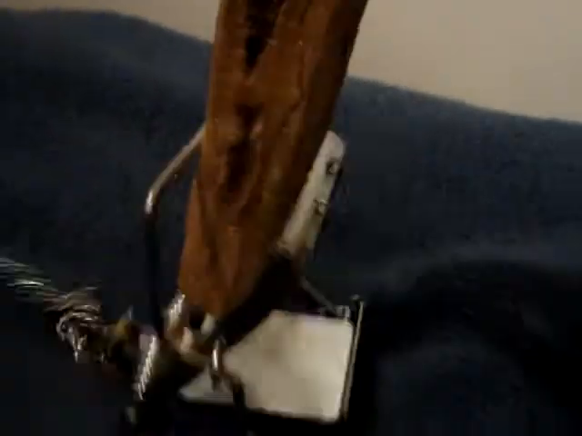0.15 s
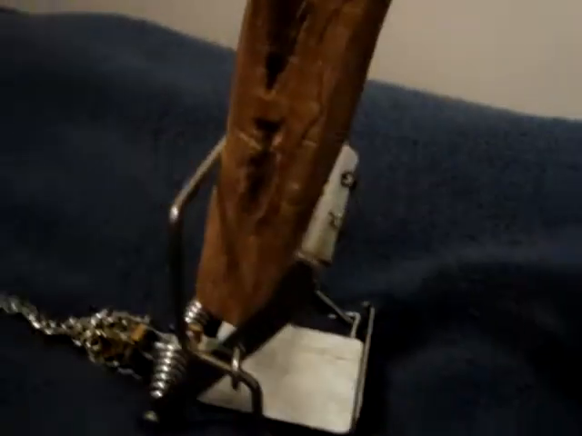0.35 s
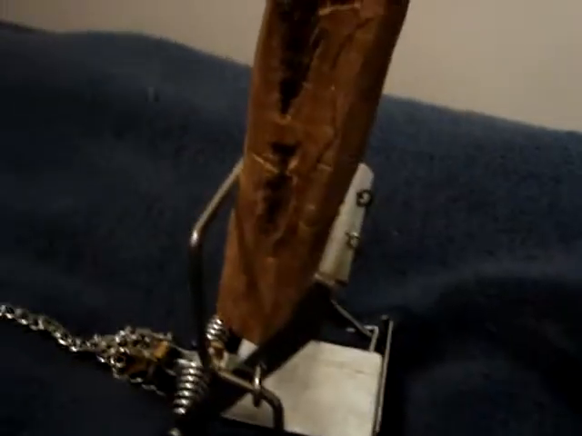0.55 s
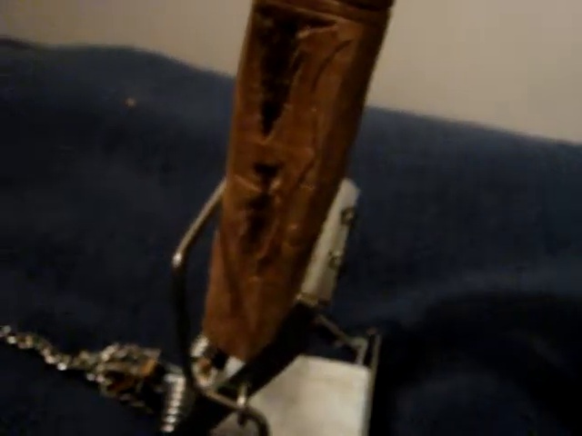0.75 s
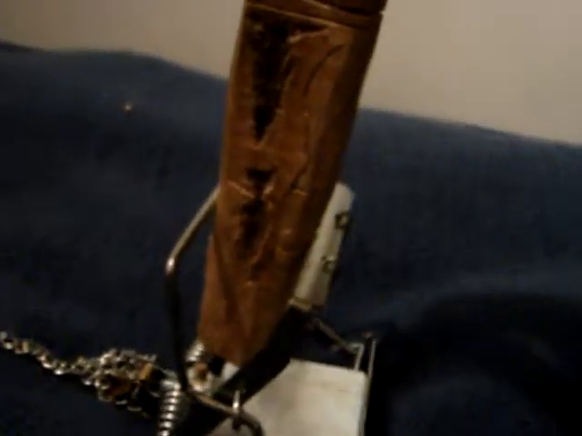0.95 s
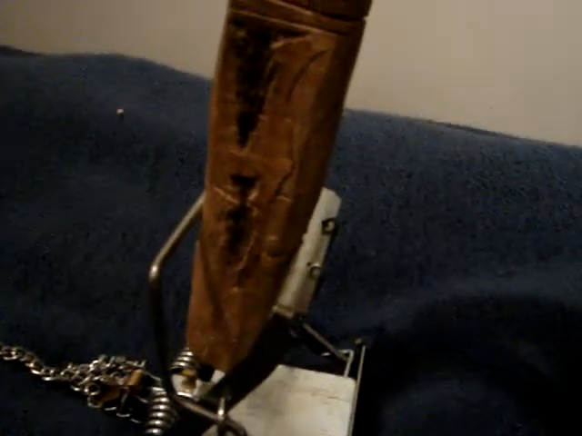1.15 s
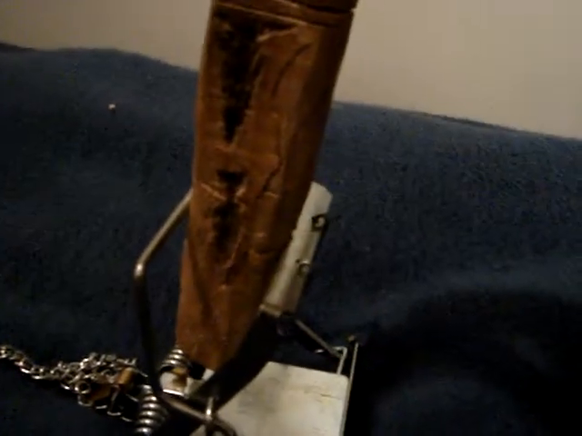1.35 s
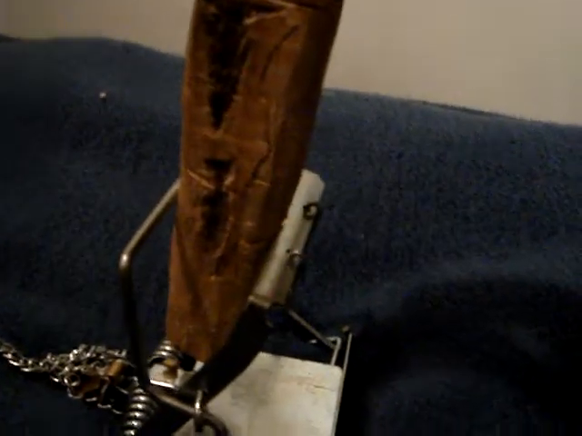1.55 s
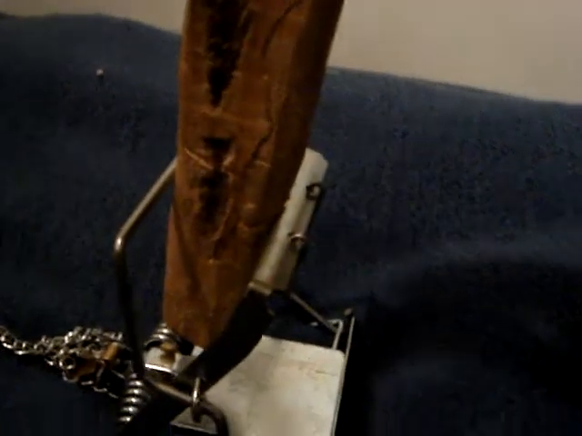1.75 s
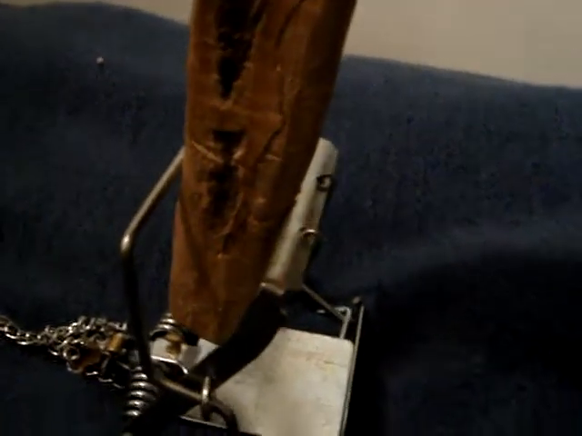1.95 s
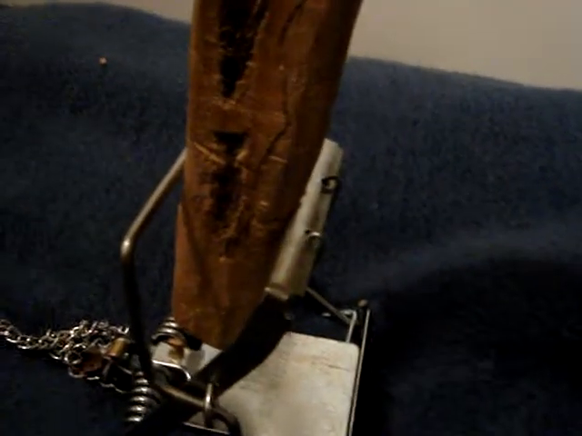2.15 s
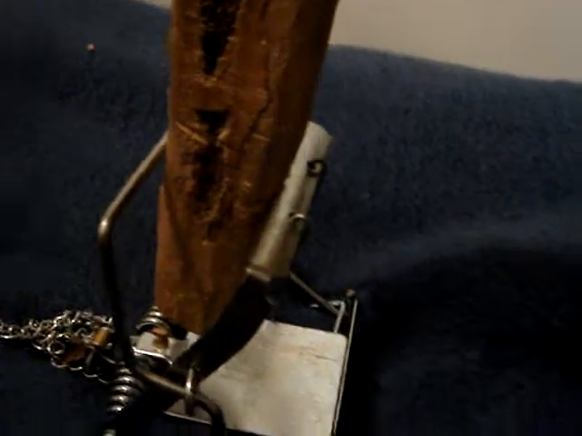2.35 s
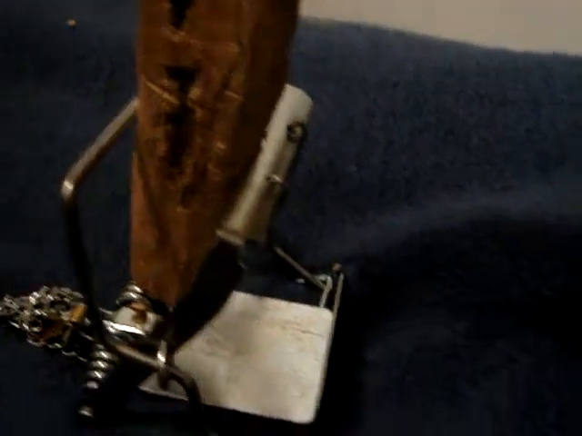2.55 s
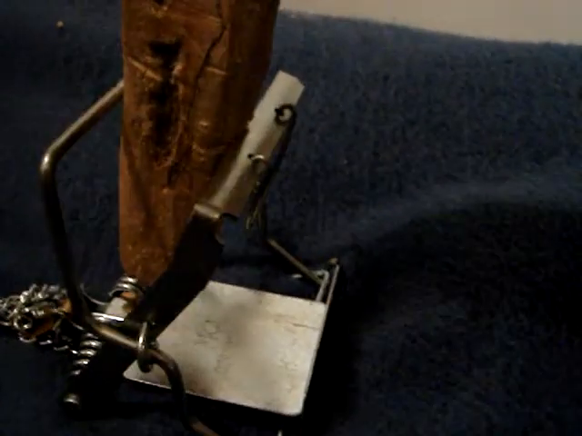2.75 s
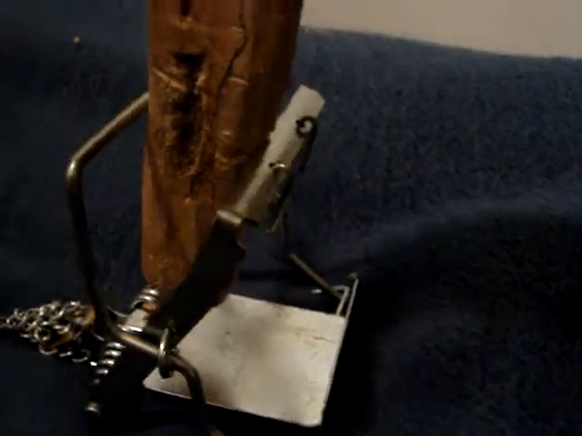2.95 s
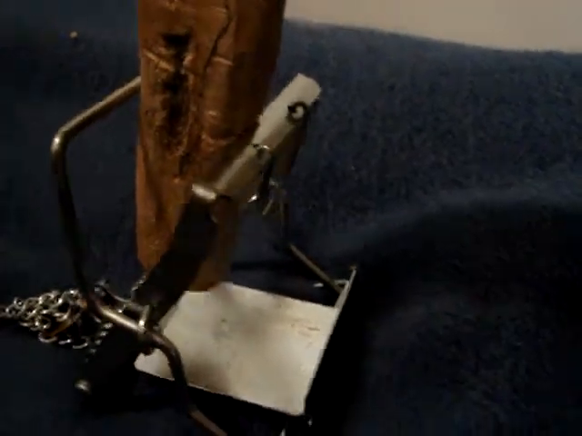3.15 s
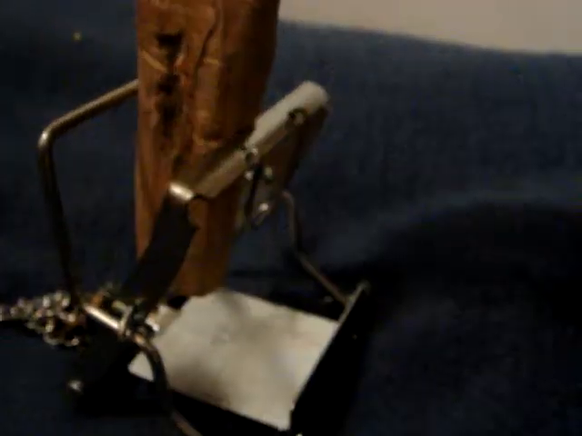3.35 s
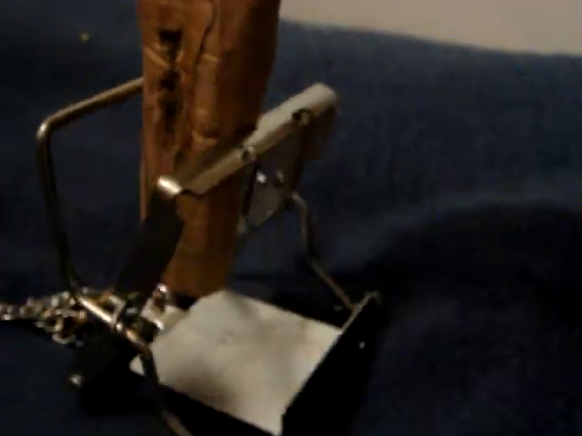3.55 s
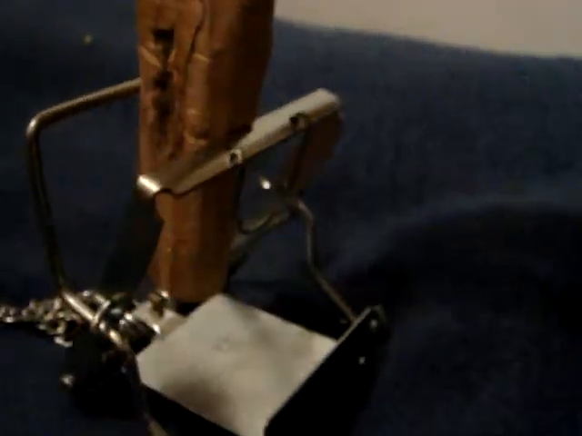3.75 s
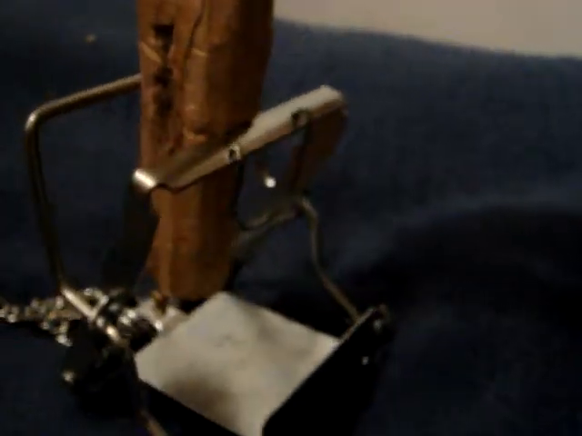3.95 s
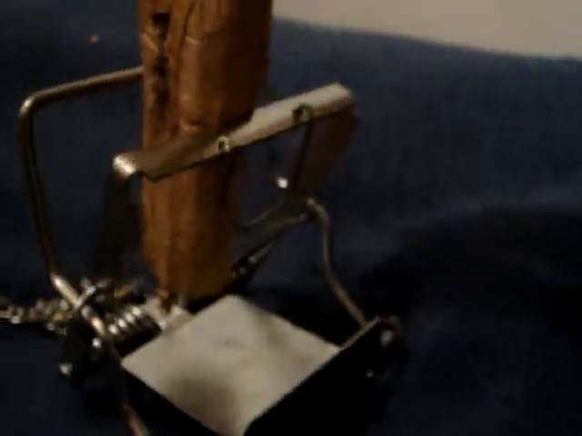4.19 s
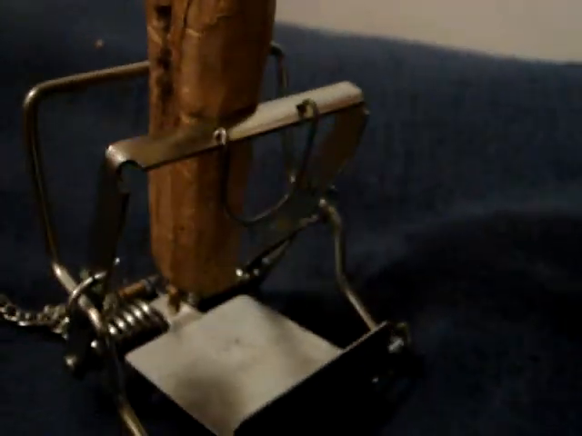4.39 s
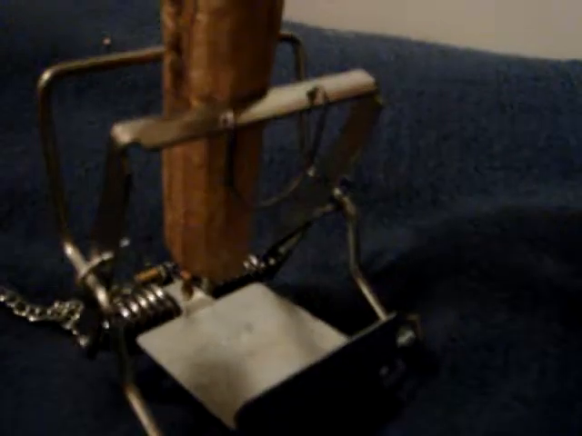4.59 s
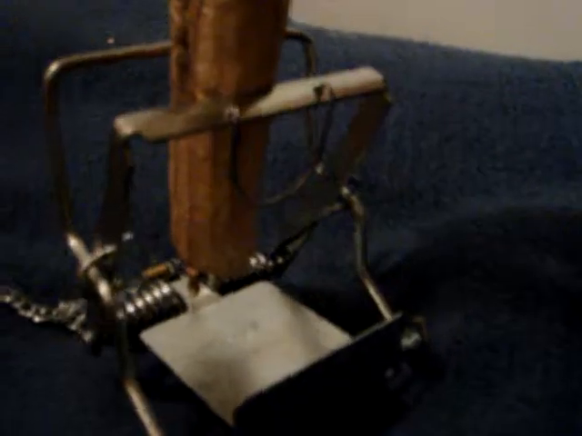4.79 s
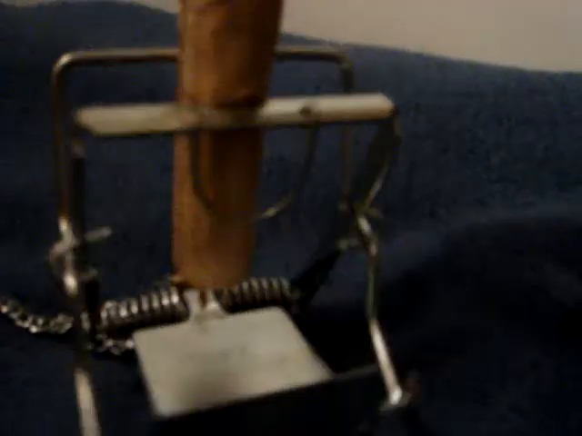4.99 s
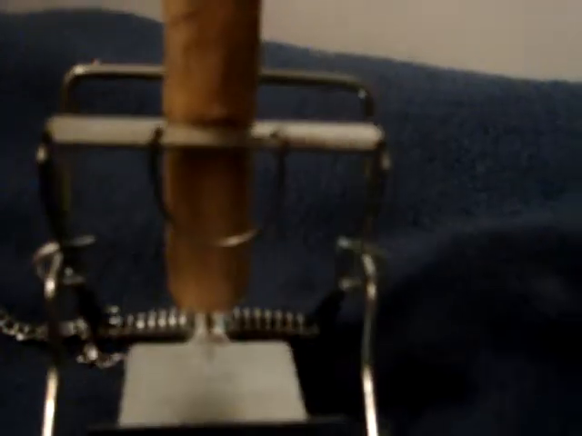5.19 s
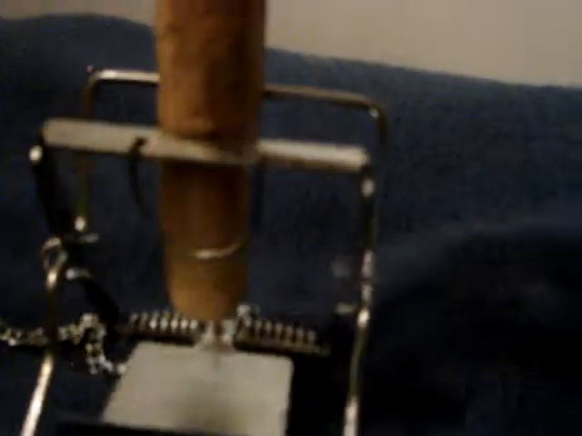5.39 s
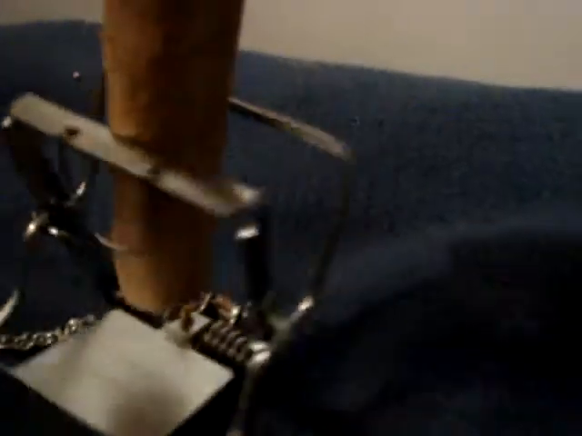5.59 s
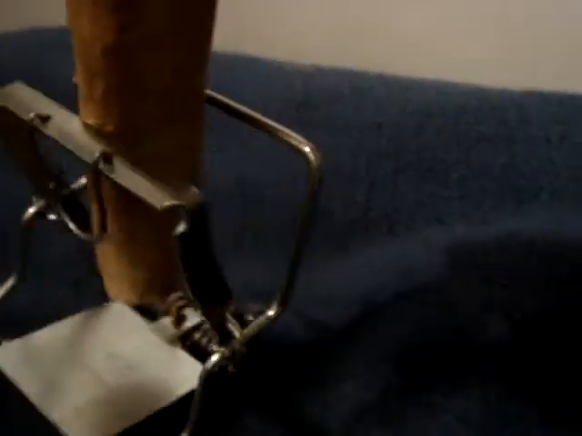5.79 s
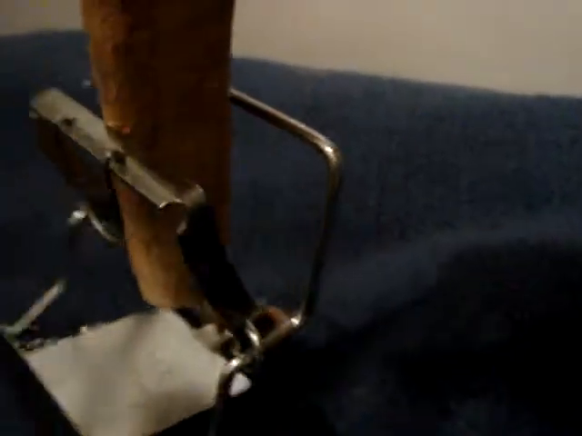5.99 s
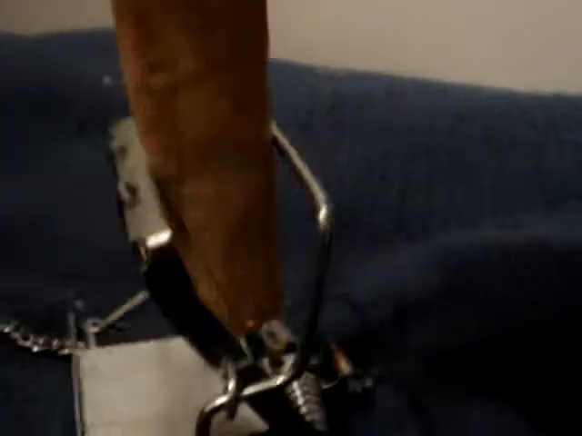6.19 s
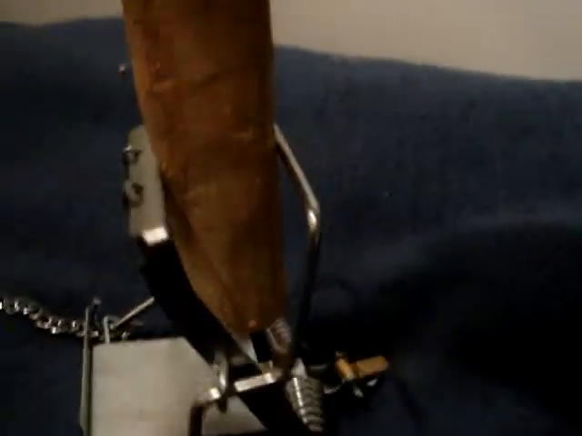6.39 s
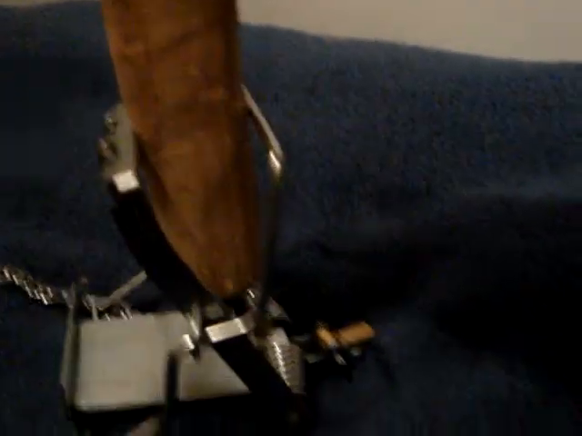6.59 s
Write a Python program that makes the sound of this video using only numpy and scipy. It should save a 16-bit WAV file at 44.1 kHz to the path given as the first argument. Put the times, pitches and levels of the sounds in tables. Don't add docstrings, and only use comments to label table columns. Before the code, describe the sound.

A latch clicks and a steel spring trap snaps shut hard, rattling and ringing briefly, then sparse metallic clinks and firmer knocks in a quiet room.

```python
import sys
import numpy as np
from scipy import signal
from scipy.fft import rfft, irfft
from scipy.io import wavfile
from scipy.ndimage import uniform_filter1d

SR = 44100
rng = np.random.default_rng(int(sys.argv[2]) if len(sys.argv) > 2 else 0)


def convert_level_to_amplitude(level_db):
    exponent = np.asarray(level_db, float) / 20
    return 10 ** exponent


def unload_audio(sound):
    columns = np.transpose(np.atleast_2d(sound))
    steps = np.round(np.clip(columns, -1, 1) * 32767)
    wavfile.write(sys.argv[1], SR, steps.astype(np.int16))


N = 292824
T = np.arange(N) / SR
SPAN = 16384
F = np.fft.rfftfreq(SPAN, 1 / SR) + 1


def unit(x):
    return x / np.sqrt(np.mean(x ** 2))


def band(x, lo_hz, hi_hz, order=2):
    return signal.sosfilt(signal.butter(order, [lo_hz, min(hi_hz, .45 * SR)], "band", fs=SR, output="sos"), x)


def curve(table):
    return np.interp(T, *np.transpose(table))


def decay(t, t60_s):
    return np.exp(-np.log(1000) * t / t60_s)


def add(out, s, sound):
    i = int(s * SR)
    out[i:i + len(sound)] += sound[:N - i]


def flatten(x, size):
    return x / np.sqrt(uniform_filter1d(x ** 2, size) + 1e-9)


def flutter(size):
    return convert_level_to_amplitude(2 * unit(band(rng.standard_normal(size), 15, 70, order=1)))


def ring(modes, spread_db):
    hz, db, t60 = np.array(modes, float).T[:, :, None]
    luck = rng.standard_normal((2, len(hz), 1))
    damping = np.log(1000) / np.clip(t60, .01, .6)
    detuned_hz = hz * (1 + 0.0019 * luck[1])
    resonances = convert_level_to_amplitude(db + spread_db * luck[0]) / (damping + 2j * np.pi * (F - detuned_hz))
    return np.sum(resonances, axis=0)


def chatter(size, rate, scatter_db):
    hit = rng.random(size) < rate / SR
    sign = np.sign(rng.standard_normal(size))
    return hit * sign * convert_level_to_amplitude(scatter_db * rng.exponential(size=size))


def clink(modes, length, clatter_db, spread_db, bright_db=0, dull_db=0, rise=0.000067):
    t = T[:SPAN]
    contacts = chatter(size=SPAN, rate=1500, scatter_db=2) * np.exp(-(t / np.clip(length, .001, .05)) ** 2)
    contacts[int(rise * SR / 2)] = 1 + 6.9 * np.exp(-rise / .0015)
    contacts *= 1 - np.exp(-t / np.clip(rise, 1e-4, .01))
    strike = rfft(contacts)
    colour_db = [-50, dull_db, dull_db, 0, 0, bright_db]
    colour = convert_level_to_amplitude(np.interp(np.log(F), np.log([200, 650, 1700, 2300, 4800, 6200]), colour_db))
    tail = rfft(rng.standard_normal(SPAN) * decay(t, .145))
    tail *= convert_level_to_amplitude(np.interp(np.log(F), np.log([800, 2500, 5000, 10000]), [-8.0, 5.5, 7.0, -10.0]))
    tone = unit(irfft(strike * colour * ring(modes, spread_db)))
    clatter = unit(irfft(strike * colour * tail))
    sound = tone * flutter(size=SPAN) + convert_level_to_amplitude(clatter_db) * clatter
    end_fade = np.clip(8 - 8 * t / t[-1], 0, 1) ** 2
    return sound * end_fade / np.abs(sound).max()


# pitch_hz, density_db (per Hz)
TONE_COLOUR = [(30, -10), (110, -8.5), (233, 3), (319, -9.5), (1150, -8.5), (1750, -14.5), (7350, -22),
               (9550, -27.5)]
# pitch_hz, width_hz, level_db
HOLLOWS = [(183.7, 13, 8), (236.1, 7.2, 12.5), (567.7, 4.8, 14.5), (1013, 5.8, 12), (1126, 41, 5.5),
           (8800, 76, 3.5)]
# time_s, level_db
SWELL = [(0, 5.5), (.9, -6.5), (1.7, -1.5), (2.05, -3.5), (2.45, 0.5), (2.75, 0), (3.1, 1.5), (3.5, 2),
         (4.0, 3.5), (4.6, 4.5), (5.2, -0.5), (6.1, -1), (6.64, -2)]
# level_db, share of ducking, share of swell, drift_db_per_s, wander_db
RANGES = [
    (-69, 0.97, 0.68, 1.3, 0.5),
    (-51.5, 1.32, 1.11, 0.1144, 0.07),
    (-54, 0.92, 0.54, 0.03, 1.9),
    (-49.5, 1.03, 0.18, -0.6352, 1.55),
    (-60.5, 0.31, 0.13, 0.27, 0.6),
]
DUCK_FROM_S, DUCKED_S, DUCK_DB, RECOVER_S = 0.21, 0.26, -14, .7
WHINE_HZ, WHINE_DB = 8123, -72.5


def room_tone():
    f = np.fft.rfftfreq(N, 1 / SR) + 1
    hz, db = np.array(TONE_COLOUR).T
    colour_db = np.interp(np.log(np.minimum(f, 9500)), np.log(hz), db)
    for centre, width, height_db in HOLLOWS:
        colour_db += height_db / (1 + (2 * (f - centre) / width) ** 2)
    noise = irfft(rfft(rng.standard_normal(N)) * convert_level_to_amplitude(colour_db), N)
    late = np.maximum(T - DUCKED_S, 0) / RECOVER_S
    duck_db = DUCK_DB * np.interp(T, [DUCK_FROM_S, DUCKED_S], [0, 1]) * np.exp(-late ** 2)
    out = convert_level_to_amplitude(WHINE_DB + 0.35 * duck_db) * flutter(size=N) * np.sin(2 * np.pi * WHINE_HZ * T)
    edges_hz = (20, 140, 320, 800, 2300, 10400)
    for lo, hi, (level_db, ducks, swells, drift, wander_db) in zip(edges_hz, edges_hz[1:], RANGES):
        wander = unit(band(rng.standard_normal(N), 6.5, 10.8, order=1))
        level_db = level_db + ducks * duck_db + swells * curve(SWELL) + drift * T
        out = out + convert_level_to_amplitude(level_db + wander_db * wander) * unit(band(noise, lo, hi, order=3))
    return out


WIRE_HZ, WIRE_SPLIT_HZ, WIRE_T60_S = 4335, 61, .45


def wire_hum():
    t = T[:SPAN]
    pair = np.sin(2 * np.pi * WIRE_HZ * t) + np.sin(2 * np.pi * (WIRE_HZ - WIRE_SPLIT_HZ) * t) / 2
    return pair * decay(t, WIRE_T60_S) * flutter(size=SPAN)


# pitch_hz, level_db, t60_s
LOOSE = [(1245, -7.5, 0.51), (1413, 5.5, 0.036), (2080, -10.5, 0.15), (2590, -2, 0.075), (2950, -14.5, 0.3),
         (3500, -21, 0.065), (4330, -18, 0.91), (4690, -13.5, 0.038), (5120, -24.5, 0.085),
         (6460, 3.5, 0.062), (7650, -4, 0.053), (8030, 5, 0.027), (8250, -21.5, 0.11), (8650, -16, 0.033)]
# start_s, peak_db, own_ring_hz, chatter_s
TICKS = [(1.901, -45.5, 2630, 0.0077), (2.008, -35, 2600, .004), (2.154, -64, 2270, .008),
         (2.2566, -40, 2950, 0.0052), (2.861, -38.5, 2530, 0.012), (2.881, -37, 2600, 0.0071),
         (2.988, -45.5, 2620, 0.028), (3.156, -41, 2610, 0.023), (3.197, -44.5, 2670, 0.018),
         (3.232, -42, 3200, 0.047), (3.856, -39.5, 2610, .012), (3.879, -37, 2650, 0.0066),
         (4.2604, -23, 4570, 0.02), (4.5, -37.5, 2204, 0.064), (4.57, -31, 6520, 0.013),
         (4.618, -40, 2634, 0.029), (4.735, -40.5, 3300, .0085), (4.826, -56, 2230, 0.005)]
# start_s, peak_db, own_ring_hz, chatter_s
JINGLES = [(5.023, -44, 4800, 0.018), (5.06, -48, 2100, .016), (5.149, -36.5, 2570, 0.033),
           (5.216, -38.5, 6460, 0.056), (5.44, -37, 5110, 0.048), (5.482, -40, 4590, 0.015),
           (5.501, -37, 2610, .008), (5.556, -39, 4810, 0.008), (5.572, -35.5, 2653, 0.015),
           (5.606, -40, 2640, 0.011), (5.628, -39, 5050, 0.014), (5.831, -34, 2690, 0.012),
           (5.853, -34, 6230, 0.0059), (6.3256, -30.5, 2635, 0.025), (6.372, -38, 2590, .016),
           (6.573, -36, 1674, 0.0057), (6.5974, -30.5, 7340, .0076)]
# start_s, peak_db, own_ring_hz, chatter_s
LEAD_INS = [
    (5.9, -39, 4590, .01),
    (6.199, -39, 2560, .016),
    (6.2135, -31, 2520, .008),
]
TICK_BRIGHT_DB, TICK_DULL_DB = -7.5, -9
JINGLE_BRIGHT_DB, JINGLE_DULL_DB = -3.5, 1.5
LEAD_BRIGHT_DB, LEAD_DULL_DB = -17, 2


def loose_clinks():
    out = np.zeros(N)
    for rows, bright_db, dull_db in ((TICKS, TICK_BRIGHT_DB, TICK_DULL_DB),
                                     (JINGLES, JINGLE_BRIGHT_DB, JINGLE_DULL_DB),
                                     (LEAD_INS, LEAD_BRIGHT_DB, LEAD_DULL_DB)):
        for s, db, hz, length in rows:
            sound = clink(LOOSE + [(hz, 6, .09)], length, -1, 2, bright_db, dull_db, rise=.0003)
            add(out, s, convert_level_to_amplitude(db) * (sound + convert_level_to_amplitude(-27.5) * wire_hum()))
    return out


# pitch_hz, level_db, t60_s
PAN = [(570, -13, 0.23), (730, -17.5, 0.26), (1237, -6, 0.084), (1491, -9, 0.14), (2173, -15, 0.22),
       (2620, 7, .05), (2610, -3.5, 0.22), (2930, -19, 0.15), (3480, -14, 0.067), (4400, 1.5, 0.053),
       (4730, -15, 0.071), (6700, -7, .1), (8190, 0, 0.015), (9050, -2.5, 0.042)]
# pitch_hz, level_db, t60_s
LEVER = [(2063, 0, .12), (2660, 0, .13), (2920, -7, .2), (3400, 1, .04), (4400, -10, .25), (5577, -20, .1),
         (6460, -24, .14)]
# start_s, peak_db, chatter_s, rise_s, bright_db
PAN_KNOCKS = [
    (4.2495, -19, 0.0091, 0.0024, -9),
    (5.9145, -17.5, 0.0095, 0.0031, -1.5),
    (6.028, -26, 0.036, 0.0009, -4),
    (6.058, -25.5, 0.032, 0.01, -2),
    (6.2215, -12.5, .015, .0025, 0.5),
]
# start_s, peak_db, chatter_s, rise_s, bright_db
LEVER_KNOCKS = [
    (5.2685, -32, 0.005, 0.00014, -9),
    (5.3235, -30, 0.0066, 0.00028, -11),
]
KNOCK_CLATTER_DB, STRIKE_SPREAD_DB = -2, 1


def firm_knocks():
    out = np.zeros(N)
    for rows, modes in ((PAN_KNOCKS, PAN), (LEVER_KNOCKS, LEVER)):
        for s, db, length, rise, bright_db in rows:
            sound = clink(modes, length, KNOCK_CLATTER_DB, STRIKE_SPREAD_DB, bright_db, rise=rise)
            add(out, s, convert_level_to_amplitude(db) * (sound + convert_level_to_amplitude(-28) * wire_hum()))
    return out


LATCH_S, LATCH_DB, LATCH_HZ = .1108, -28, 1545


def latch_slip():
    out = np.zeros(N)
    click = clink(LOOSE + [(LATCH_HZ, 3.5, .1)], 0.0033, -1.6, 2.5, bright_db=-22)
    add(out, LATCH_S, convert_level_to_amplitude(LATCH_DB) * click)
    return out


BOUNCE_RISE_S = 0.001
THUD_S, THUD_DB, THUD_FADE_DB_PER_S = .149, -31.5, 136


def blanket_thud():
    since = np.maximum(T[:2 * SPAN] - THUD_S, 0)
    level = (1 - np.exp(-since / BOUNCE_RISE_S)) * convert_level_to_amplitude(THUD_DB - THUD_FADE_DB_PER_S * since)
    out = np.zeros(N)
    add(out, 0, level * unit(band(rng.standard_normal(2 * SPAN), 13, 39)))
    return out


# time_s, level_db
FRAME = [
    (.15, -20),
    (.178, -51),
    (.24, -22.5),
    (.29, -27.5),
    (.313, -42),
    (.327, -36),
    (.353, -56),
    (.385, -68),
    (.52, -84),
]
FRAME_HZ = 4257


def frame_ring():
    sounding = uniform_filter1d(1. * ((T > FRAME[0][0]) & (T < FRAME[-1][0])), size=100)
    return sounding * convert_level_to_amplitude(curve(FRAME) + 6.5) * np.sin(2 * np.pi * FRAME_HZ * T)


# start_s, peak_db, centre_hz
STRIKES = [
    (.1112, -30, 1500),
    (.1512, -10, 2100),
    (.1619, -6, 2300),
    (.172, -14, 4400),
    (.1825, -12, 3900),
    (.211, -24, 4000),
    (.235, -24, 5000),
    (.2785, -19, 3000),
    (.3075, -22, 2500),
    (.324, -19, 5500),
]


def blow_cracks():
    out = np.zeros(N)
    for s, db, hz in STRIKES:
        crack = band(-signal.unit_impulse(400), hz / 5, hz * 1.3)
        add(out, s, convert_level_to_amplitude(db) * crack / np.abs(crack).max())
    return out


# pitch_hz; then level_db, t60_s of each
JAWS_HZ = [1100, 1544, 1857, 2580, 2789, 3191, 3583, 3645, 4100, 4393]
JAWS = [(-32, 0.075), (2.5, 0.21), (0, 0.18), (-4, 0.39), (-18, 0.18), (-4.5, 0.48), (-7, 0.23), (4, 0.7),
        (6.5, .3), (5, 0.41)]
# pitch_hz; then level_db, t60_s of each
SPRINGS_HZ = [4953, 5062, 5496, 6072, 6435, 6512, 7460, 8299, 8845, 9146, 9499]
SPRINGS = [(-3, .3), (1.5, 0.43), (-10, .23), (-8, .15), (-11.5, 0.57), (-8, 0.42), (-12.5, 0.49),
           (-1, 0.12), (-24, 0.13), (-6, 0.23), (-17, 0.54)]
# start_s, pan_db, jaws_db, springs_db
BOUNCES = [(.149, -21.5, -12, -13), (0.157, -25, -20, -15), (0.174, -22, -13, -34),
           (.184, -23.5, -17.5, -16.5), (.197, -27, -28, -36), (.211, -34, -23, -18.5),
           (0.23, -25.5, -15.5, -17), (.25, -48, -29.5, -24.5), (0.28, -26.5, -27, -17),
           (0.297, -30.5, -25, -35), (0.306, -42, -32, -19.5), (0.326, -43, -31, -41),
           (0.347, -44, -34, -43)]
FADE_DB_PER_S = (330, 348, 271)
SETTLE_S, SETTLE_DB_PER_S = 0.365, 603
CLATTER_DB, CLATTER_GAIN_DB_PER_S = -12.5, 199


def steel_rattle():
    t = T[:2 * SPAN]
    steel = np.zeros(2 * SPAN)
    for s, _, _ in STRIKES:
        add(steel, s, irfft(ring(np.c_[JAWS_HZ + SPRINGS_HZ, JAWS + SPRINGS], spread_db=4.5)))
    starts, *parts_db = np.array(BOUNCES).T[:, :, None]
    since = np.maximum(t - starts, 0)
    latest = np.where(t >= starts, since, 1).min(axis=0)
    clatter = unit(band(chatter(size=2 * SPAN, rate=6800, scatter_db=1.5), 2200, 5600, order=1))
    clatter_db = CLATTER_DB + CLATTER_GAIN_DB_PER_S * np.minimum(latest, .04)
    rattle = flatten(unit(steel), size=1300) + convert_level_to_amplitude(clatter_db + 4.0) * clatter
    rise = 1 - np.exp(-since / BOUNCE_RISE_S)
    settle = convert_level_to_amplitude(-SETTLE_DB_PER_S * np.maximum(t - SETTLE_S, 0))
    out = np.zeros(N)
    ranges_hz = ((400, 2000), (2000, 4300), (4300, 11000))
    for edges, db, fade in zip(ranges_hz, parts_db, FADE_DB_PER_S):
        strength = np.sqrt(np.sum((rise * convert_level_to_amplitude(db - fade * since)) ** 2, axis=0))
        add(out, 0, settle * strength * flatten(band(rattle, *edges), size=1300))
    return out


def scene():
    handling = loose_clinks() + firm_knocks() + latch_slip()
    snap = blanket_thud() + frame_ring() + blow_cracks() + steel_rattle()
    return (room_tone() + handling + snap)[None]


def roll_off(x):
    return signal.sosfilt(signal.butter(12, 10480, fs=SR, output="sos"), x)


def record(dry):
    steep = signal.ellip(12, .2, 60, 10120, fs=SR, output="sos")
    mix = signal.sosfilt(np.vstack([steep, steep]), dry)
    return roll_off(mix)


dry = scene()
out = record(dry)
unload_audio(out)
```